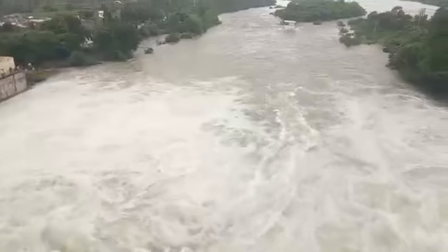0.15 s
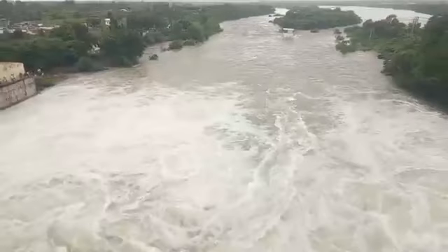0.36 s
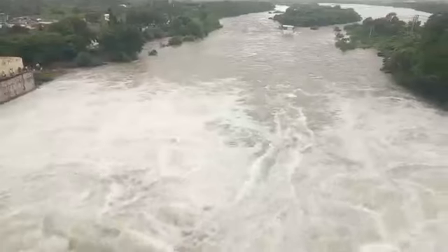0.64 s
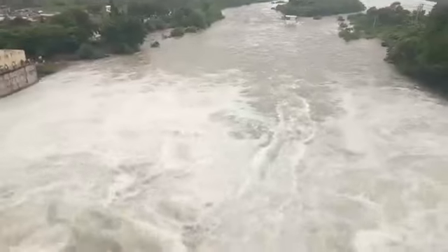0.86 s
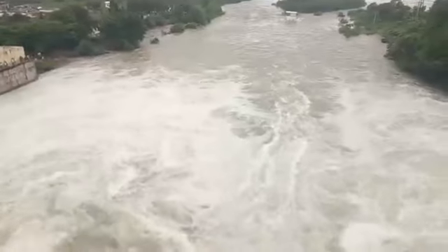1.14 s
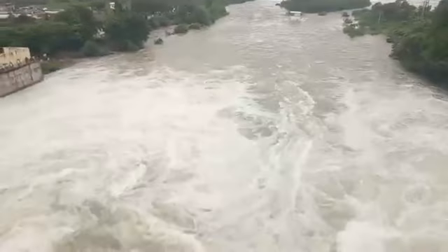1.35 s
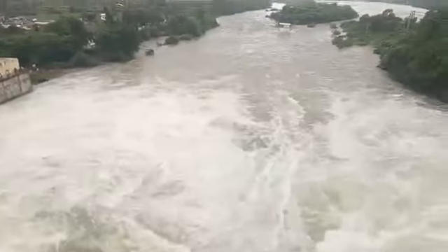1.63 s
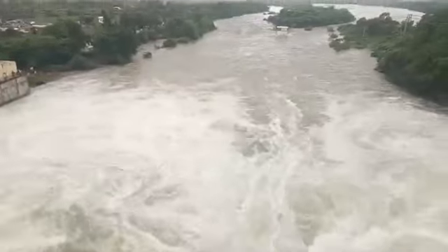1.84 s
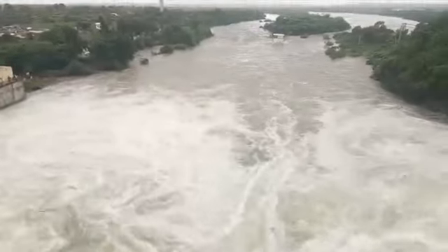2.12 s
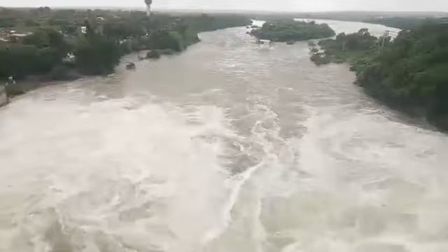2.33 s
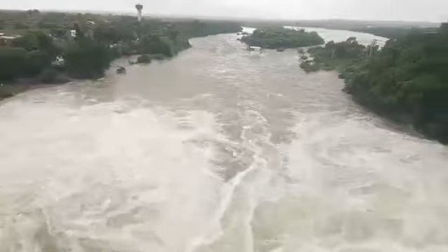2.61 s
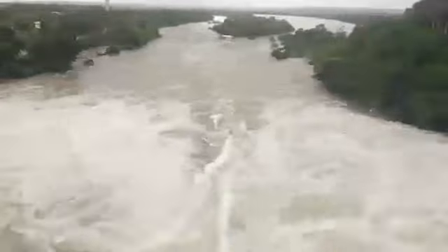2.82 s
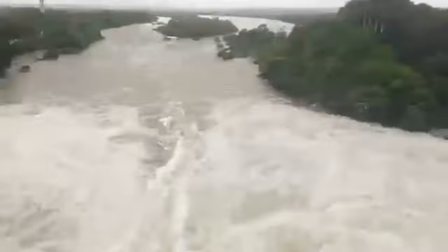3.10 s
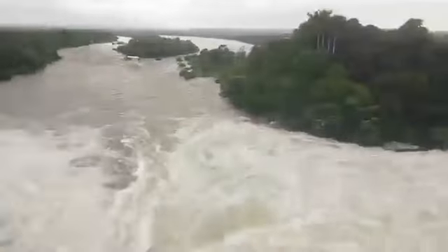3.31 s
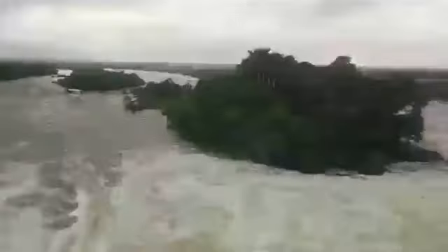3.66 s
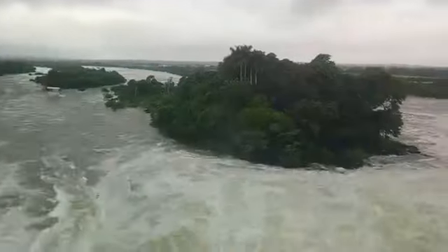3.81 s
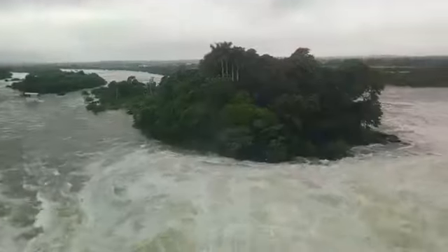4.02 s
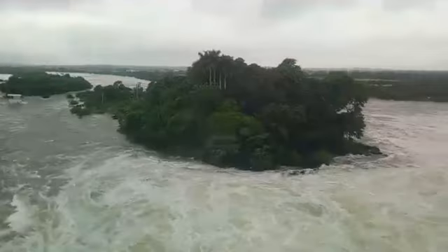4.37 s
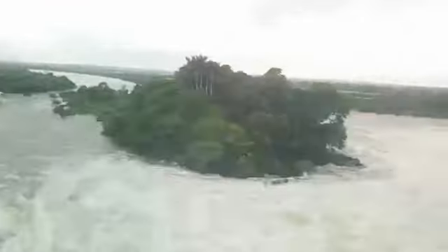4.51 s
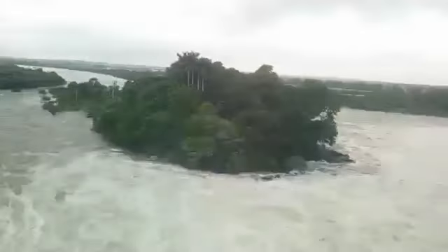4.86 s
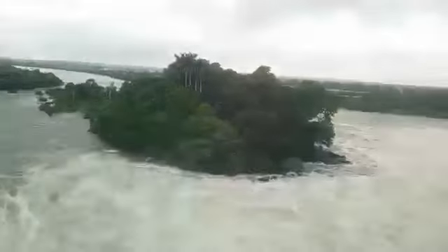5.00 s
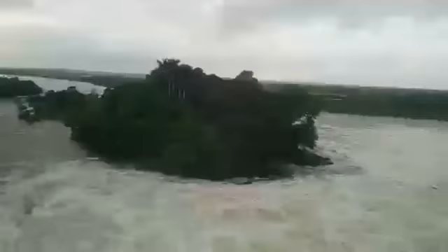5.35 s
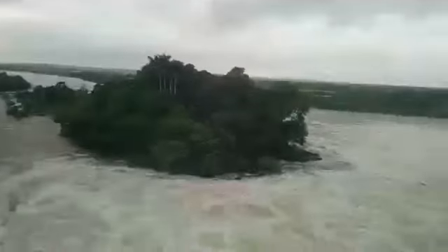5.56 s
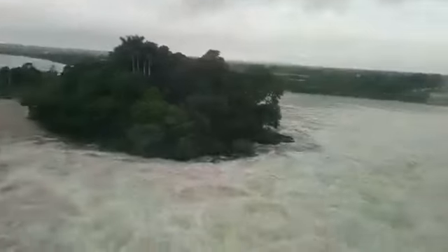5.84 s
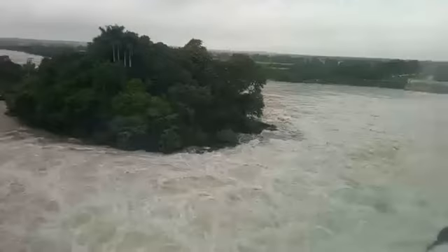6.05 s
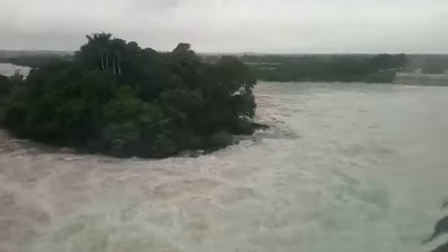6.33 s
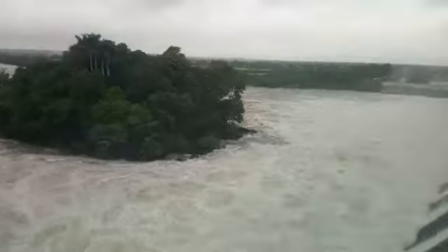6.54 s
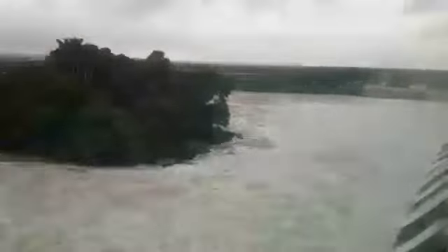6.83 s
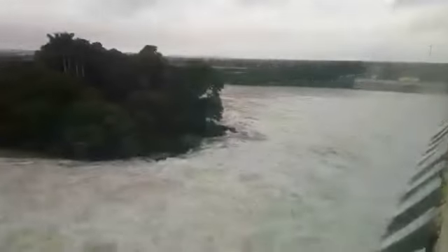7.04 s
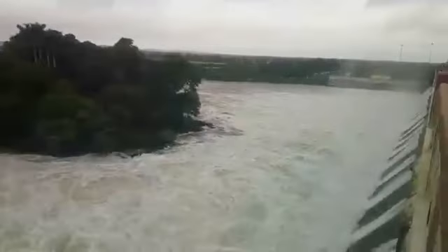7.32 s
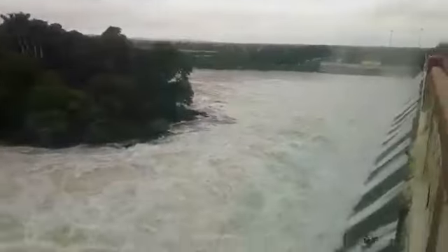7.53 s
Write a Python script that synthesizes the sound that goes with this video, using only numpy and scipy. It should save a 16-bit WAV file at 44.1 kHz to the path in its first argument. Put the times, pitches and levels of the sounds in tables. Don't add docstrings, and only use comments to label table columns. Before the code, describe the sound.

Loud, unbroken rush of floodwater below an open dam, heard outdoors from the crest on a hand-held phone. Dense roar, bubbling froth and hissing spray come first; around four seconds the phone swings toward the gates and the deep boom grows heavier, with uneven low thumps, easing slightly at the very end. Mono, slightly compressed, with a thin, watery, faintly grainy treble.

```python
import sys
import numpy as np
from scipy import signal
from scipy.fft import rfft, irfft, next_fast_len
from scipy.io import wavfile
from scipy.ndimage import uniform_filter1d

SR = 44100
rng = np.random.default_rng(int(sys.argv[2]) if len(sys.argv) > 2 else 0)


def ratio_of_db(decibels):
    return 10 ** (np.asarray(decibels, float) / 20)


def generate_wav(signal):
    frames = np.transpose(np.atleast_2d(signal))
    scaled = np.clip(frames, -1, 1) * 32767
    pcm = np.round(scaled).astype(np.int16)
    wavfile.write(sys.argv[1], SR, pcm)


N = 338247
SIZE = next_fast_len(N)
HZ = np.maximum(np.arange(SIZE // 2 + 1) * SR / SIZE, 1)

# [pitch_hz, density_db_per_hz]
POOL_COLOUR = [(12, -40), (22, -14), (36, -22.5), (55, -10), (92, -1), (180, -0.5), (260, -2.5),
               (446, -7.5), (840, -9.5), (1260, -16.5), (1700, -16), (2200, -45)]
SPRAY_COLOUR = [(1100, 3.5), (1400, 0), (1900, 0.5), (2900, -2.5), (3400, -6), (4300, -4), (4900, -7.5),
                (6500, -6.5), (7000, -12.5), (7100, -12), (7420, -16), (7500, -50)]
TOP_COLOUR = [(7450, 2), (9500, -6), (11500, -12), (13700, -15), (14200, -13), (14300, -8), (15750, -8)]
POOL_EDGES_HZ = [12, 90, 180, 330, 620, 1200]
SPRAY_EDGES_HZ = [1200, 1900, 3100, 4900, 9000]
TOP_EDGES_HZ = [6000, 9500, 11800, 14200, 19000]
# [river_level_db, turn_gain_db, spurt_share]
POOL_LAW = [
    (-36.5, 5.5, 0.01),
    (-28, 5, 0.01),
    (-24.5, 1.5, 0.01),
    (-26.5, -0.1, 0.22),
    (-25.5, -3.5, 0.36),
]
# [river_level_db, turn_gain_db, thrown_share, mist_share, spurt_share]
SPRAY_LAW = [
    (-30.5, -1.46, 0.15, .1, 1),
    (-30.5, -0.3, 0.76, -0.23, .9),
    (-32, -0.26, 0.25, -0.079, 0.79),
    (-35.5, -0.4, 0.11, 0.91, 0.83),
]
TOP_LAW = [
    (-53.5, -1.5, 0.81, .1, 0.61),
    (-60.5, 0, 1.01, .01, 0.73),
    (-69.5, 4.5, 1.2, .2, 1.1),
    (-65.5, 5.6, .8, .4, 1.01),
]
# [time_s, turn_0_to_1]
TURN = [(0, 0.25), (0.6, 0.0), (1.8, 0), (3.0, 0.22), (3.78, 0.23), (3.95, 1), (5, 0.83), (5.9, 1),
        (6.5, 1.0), (7.2, 0.9), (7.67, 0.38)]
# [centre_s, level_db]
POUNDS = [(0.47, 5.3), (0.56, -1), (0.88, -9.2), (1.0, 7.1), (1.18, 2), (1.27, -11), (1.35, 10),
          (1.52, 4.9), (2.23, 6.9), (2.9, -2), (3.48, 0), (4.74, -23), (5.09, 12), (5.24, 8), (5.9, 3),
          (5.99, -7), (6.1, 7), (6.18, -15), (6.26, 7.9), (6.56, -7.7)]
# [centre_s, level_db]
HEAVES = [(1.17, -4.2), (1.29, 6), (1.39, -5), (1.45, 6), (1.63, 8), (1.69, -3.1), (2.23, 9), (2.64, -4.3),
          (2.7, 2), (2.92, 6), (3.47, -2), (3.61, -9), (3.9, -5), (3.96, 4.3), (4.3, -6), (4.67, 8),
          (4.78, 4), (5.38, -2), (5.8, 0.5), (6.01, -9), (6.18, 0.5), (6.24, -3.7), (6.7, -2), (6.79, -6)]
# [centre_s, level_db]
SPURTS = [(0.38, -2.5), (1.09, -2.5), (1.31, 3), (1.43, 1.7), (2.37, -3.8), (3.48, 1), (3.91, 2), (3.95, 0),
          (3.99, 0.5), (4.08, 1.5), (4.13, -5), (4.21, 3), (4.25, -1), (4.31, 1.5), (4.5, -3.5),
          (5.01, 1.4), (5.52, 3.5), (5.6, 0.5), (5.64, -2), (5.82, -3.5), (6.04, -1.5), (6.15, 2.5),
          (6.33, 2.5), (6.58, -1.5), (6.62, 2), (6.71, 2.5), (6.83, 1), (7.02, -3)]
# [time_s, level_db]
THROWN_SPRAY = [(0, 0), (.28, 4.5), (.6, 2), (.66, 1), (1.15, -3), (1.7, -3), (1.9, -0.1), (2.62, 2.5),
                (2.95, -1), (3.94, -2), (4.04, 3), (4.22, 2.5), (4.44, 1.5), (4.52, -1.5), (5.95, -1.5),
                (6.3, 2.2), (7.1, 1.8), (7.67, 3)]
# [time_s, level_db]
MIST = [(0, -2), (0.3, 0.3), (1.15, -4.5), (2.3, 0.2), (3.4, 2.8), (3.95, -0.1), (5.2, 0), (5.7, 4),
        (6, 2.7), (6.2, -1.3), (7, 0.6), (7.4, 5), (7.67, 5)]
# [centre_s, pitch_hz, level_db]
CLOUDS = [(.16, 2400, 1.6), (.25, 450, 2.5), (.41, 450, -0.5), (.54, 1500, -3), (.68, 1500, 1.8),
          (1.17, 240, 2.5), (1.26, 240, -1.5), (1.41, 860, 1), (1.6, 3900, 1.5), (2.14, 2400, -2.5),
          (2.3, 860, 1), (2.9, 860, 1), (3.27, 3900, 2), (3.38, 450, -0.5), (3.55, 1500, -2),
          (3.76, 3900, 1.5), (3.88, 450, -4), (4.0, 240, 3), (4.33, 1500, -3.5), (4.81, 240, -2.2),
          (4.89, 450, -3.5), (5.09, 450, -2.5), (5.14, 860, -1), (5.38, 1500, -1.6), (5.9, 3900, -1.8),
          (6.15, 450, 0.5), (6.32, 860, -2), (6.77, 1500, 1.5), (7.36, 240, -3), (7.37, 1500, 2)]
# [centre_s, pitch_hz, level_db]
WISPS = [(.3, 15000, -2.5), (.5, 10500, 2), (.55, 13000, 1.5), (.6, 15000, -1.5), (.8, 10500, -2),
         (.8, 13000, -1.5), (1.4, 13000, 1.5), (1.9, 8500, 3), (2.2, 13000, -1.5), (2.75, 15000, 2.2),
         (2.8, 8500, 1), (3.2, 10500, -3), (3.9, 15000, -1.5), (4.2, 13000, 2.2), (4.2, 8500, 1),
         (4.75, 10500, 3), (5.4, 15000, -1.5), (5.75, 10500, 1.5), (5.8, 15000, -2.5), (5.8, 13000, -2.2),
         (6.4, 15000, 1.5), (6.5, 13000, 2.2), (6.55, 8500, -1.5), (6.85, 15000, 1.5), (7.35, 15000, 1.5),
         (7.4, 8500, 1)]
# [start_s, end_s]
SILENT_SPANS = [(0, 0.12), (0.17, 0.21), (0.26, 0.46), (0.52, 0.59), (0.68, 0.73), (0.8, 0.84),
                (0.93, 0.97), (1.06, 1.14), (1.18, 1.23), (1.39, 1.57), (1.83, 1.87), (1.92, 2.12),
                (2.16, 2.52), (2.6, 2.68), (2.76, 2.84), (2.98, 3.49), (3.54, 3.62), (3.7, 3.96),
                (4.01, 4.08), (4.15, 4.2), (4.27, 4.48), (4.52, 4.6), (4.65, 4.82), (4.87, 5.08),
                (5.13, 5.83), (5.88, 6.17), (6.36, 6.77), (6.83, 7.21), (7.26, 7.33), (7.38, 7.42)]
# [centre_s, low_hz, high_hz]
HOLES = [(2.23, 6600, 7060), (3.81, 6700, 7060), (4.75, 6700, 7060), (6.07, 6600, 7000),
         (5.865, 4750, 5050), (7.3, 3600, 3930), (2.49, 5150, 5400), (3.22, 3380, 3600), (5.29, 3350, 3530),
         (5.43, 3100, 3350), (5.52, 3350, 3580), (5.96, 3440, 3600)]

POUND_S, HEAVE_S, SPURT_S, CLOUD_S, WISP_S = 0.035, 0.029, 0.013, 0.057, 0.12
POUND_SHARE, HEAVE_SHARE = 0.78, 0.66
KEPT_BAND_HZ = (7070, 7430)


def pool(churn, surge):
    bubbles = froth(1200, low_hz=119, high_hz=1320, cycles=37, spread_db=3)
    source = (churn + ratio_of_db(-3) * bubbles) * colour(POOL_COLOUR)
    return layers(source, POOL_EDGES_HZ, pool_levels(), surge, surge_db=0.11,
                  patchy_db=0.7, soft=0.23, even_s=0.15, count=1)


def pool_levels():
    controls = [np.ones(N), *in_time(TURN), swells(SPURTS, SPURT_S)]
    levels_db = np.array(POOL_LAW) @ controls + patches(CLOUDS, CLOUD_S, POOL_EDGES_HZ)
    levels_db[0] += POUND_SHARE * swells(POUNDS, POUND_S)
    levels_db[1] += HEAVE_SHARE * swells(HEAVES, HEAVE_S)
    return levels_db


def spray(churn, surge):
    fizz = froth(6000, low_hz=1206, high_hz=7167, cycles=69, spread_db=2.5)
    source = (churn + ratio_of_db(-5) * fizz) * colour(SPRAY_COLOUR)
    levels_db = spray_levels(SPRAY_LAW) + patches(CLOUDS, CLOUD_S, SPRAY_EDGES_HZ)
    return layers(source, SPRAY_EDGES_HZ, levels_db, surge, surge_db=0.61,
                  patchy_db=1.22, soft=0.24, even_s=0.079, count=2)


def spray_levels(law):
    controls = [np.ones(N), *in_time(TURN), *in_time(THROWN_SPRAY), *in_time(MIST), swells(SPURTS, SPURT_S)]
    return np.array(law) @ controls


def froth(per_s, low_hz, high_hz, cycles, spread_db):
    strengths = ratio_of_db(spread_db * np.minimum(rng.exponential(1, N), 5)) * rng.choice([-1, 1], N)
    bursts = strengths * (rng.random(N) < per_s / SR)
    pitch_index = rng.integers(0, 32, N)
    out = 0
    for k, hz in enumerate(np.geomspace(low_hz, high_hz, 32)):
        decay = ratio_of_db(-60 * hz / (cycles * SR))
        w = 2 * np.pi * hz / SR
        struck = bursts * (pitch_index == k) + 1e-18
        ringing = signal.lfilter([1], [1, -2 * decay * np.cos(w), decay ** 2], struck)
        out = out + hz * np.sin(w) * ringing
    spectrum = rfft(out, SIZE)
    return spectrum / np.sqrt(uniform_filter1d(np.abs(spectrum) ** 2, size=300) + 1e-12)


def turbulence():
    return rfft(rng.standard_normal(SIZE)) / np.sqrt(SIZE)


def drift(rate_hz):
    hop = 40
    r = np.exp(-2 * np.pi * rate_hz * hop / SR)
    noise = rng.standard_normal(N // hop + 2002)
    slow = signal.lfilter([1], [1, -2 * r, r * r], noise)[2000:]
    slow = slow / np.sqrt(np.mean(slow ** 2) + 1e-20)
    return np.interp(np.arange(N) / hop, np.arange(len(slow)), slow)


def layers(spectrum, edges_hz, levels_db, surge, surge_db, patchy_db, soft, even_s, count):
    out = 0
    even = int(even_s * SR)
    for low, high, level_db in zip(edges_hz, edges_hz[1:], levels_db):
        cuts_hz = np.geomspace(low, high, count + 1)
        parts = 0
        for a, b in zip(cuts_hz, cuts_hz[1:]):
            parts = parts + ratio_of_db(patchy_db * drift(5.9)) * band(spectrum, a, b, soft)
        power = uniform_filter1d(uniform_filter1d(parts ** 2, even), even)
        steady = parts / np.sqrt(power + 1e-20)
        out = out + ratio_of_db(level_db + surge_db * surge) * steady
    return out


def band(spectrum, low_hz, high_hz, soft):
    def above(edge_hz):
        return np.clip(.5 + np.log(HZ / edge_hz) / soft, 0, 1)
    return irfft(spectrum * (above(low_hz) - above(high_hz)), SIZE)[:N]


def colour(points):
    hz, db = np.transpose(points)
    return ratio_of_db(np.interp(np.log(HZ), np.log(hz), db))


def in_time(rows):
    s, *columns = np.transpose(rows)
    return [np.interp(np.arange(N) / SR, s, c) for c in columns]


def swells(events, half_s):
    s, db = np.transpose(events)
    t = np.arange(0, N + 128, 128) / SR
    bells = np.exp(-.5 * ((t[:, None] - s) / half_s) ** 2)
    return np.interp(np.arange(N) / SR, t, bells @ db)


def patches(events, half_s, edges_hz):
    curves = []
    for low, high in zip(edges_hz, edges_hz[1:]):
        own = [(s, db) for s, hz, db in events if low < hz < high]
        curves.append(swells(own, half_s) if own else np.zeros(N))
    return np.array(curves)


def scene():
    churn, surge = turbulence(), drift(11.4)
    return (pool(churn, surge) + spray(churn, surge))[None]


def rounded(x, limit=0.8):
    return limit * np.tanh(x / limit) * ratio_of_db(0.01)


def mute_kept_band(x, trim_s=.02, fade_s=.035, floor_db=-60):
    t = np.arange(0, N + 32, 32) / SR
    away_s = np.min([np.maximum(a - t, t - b) for a, b in SILENT_SPANS], axis=0)
    fade = np.clip((away_s + trim_s) / fade_s, 0, 1)
    gain = np.maximum(np.sin(np.pi / 2 * fade) ** 2, ratio_of_db(floor_db))
    lost = 1 - np.interp(np.arange(N) / SR, t, gain)
    x = x - lost * band(rfft(x, SIZE), *KEPT_BAND_HZ, soft=.004)
    return irfft(rfft(x, SIZE) * (HZ < KEPT_BAND_HZ[1]), SIZE)[:N]


def holed(x, half_s=.04):
    t, spectrum = np.arange(N) / SR, rfft(x, SIZE)
    for s, low_hz, high_hz in HOLES:
        fade = np.cos(np.pi / 2 * np.clip((t - s) / half_s, -1, 1))
        x = x - fade * band(spectrum, low_hz, high_hz, soft=.01)
    return x


def rebuilt_top(x):
    tilt = np.where(HZ < 1200, colour(POOL_COLOUR) * ratio_of_db(16.5), colour(SPRAY_COLOUR))
    flat = rfft(x, SIZE) / tilt
    first, second = (np.roll(flat, round(hz * SIZE / SR)) for hz in (6750, 11250))
    inside = (HZ > KEPT_BAND_HZ[1]) & (HZ < 15730)
    copy = np.where(HZ < TOP_EDGES_HZ[3], first, second) * colour(TOP_COLOUR) * inside
    levels_db = spray_levels(TOP_LAW) + patches(WISPS, WISP_S, TOP_EDGES_HZ)
    top = layers(copy, TOP_EDGES_HZ, levels_db, drift(9.0), surge_db=0.6,
                 patchy_db=1.0, soft=.06, even_s=0.035, count=2)
    return irfft(rfft(top, SIZE) * inside, SIZE)[:N]


def top_cut(x):
    return signal.sosfilt(signal.butter(12, 17020, fs=SR, output="sos"), x)


def record(dry):
    kept = mute_kept_band(rounded(dry[0]))
    mix = (holed(kept) + rebuilt_top(kept))[None]
    return top_cut(mix)


dry = scene()
out = record(dry)
generate_wav(out)
```